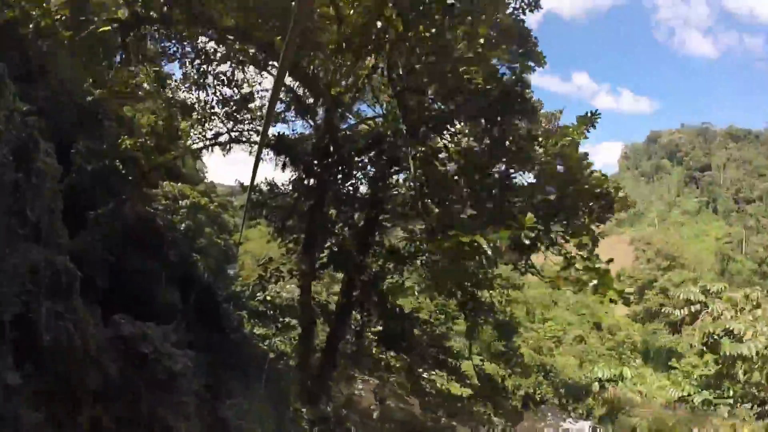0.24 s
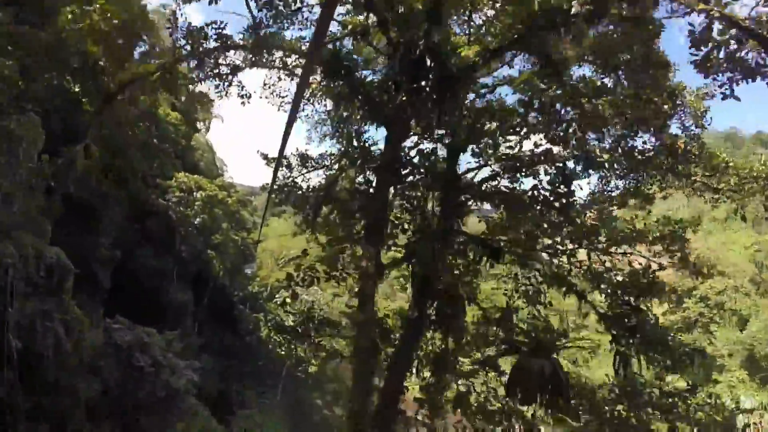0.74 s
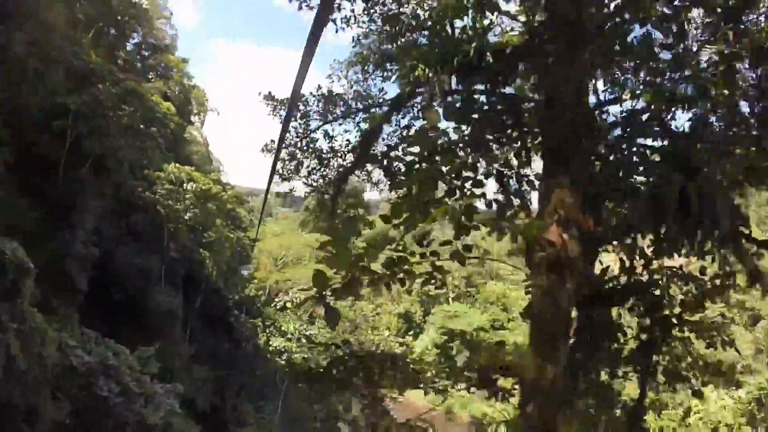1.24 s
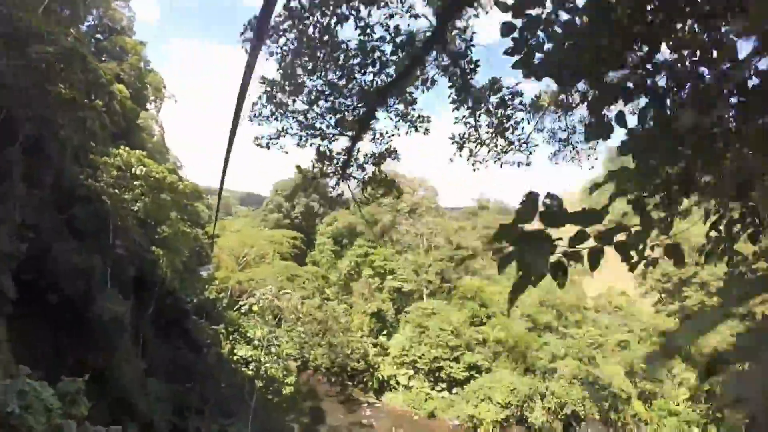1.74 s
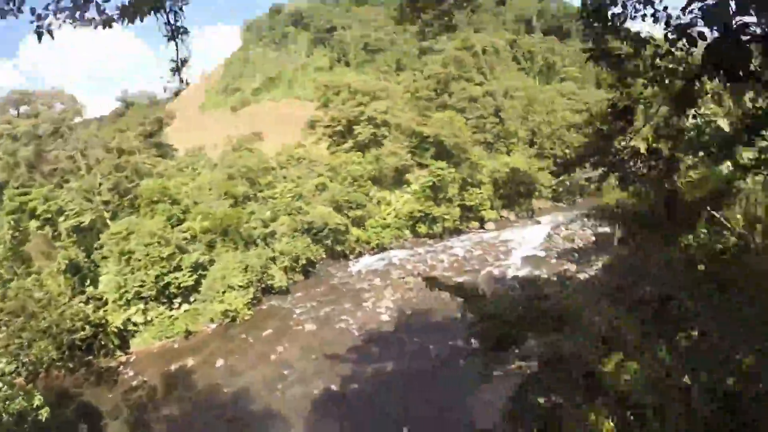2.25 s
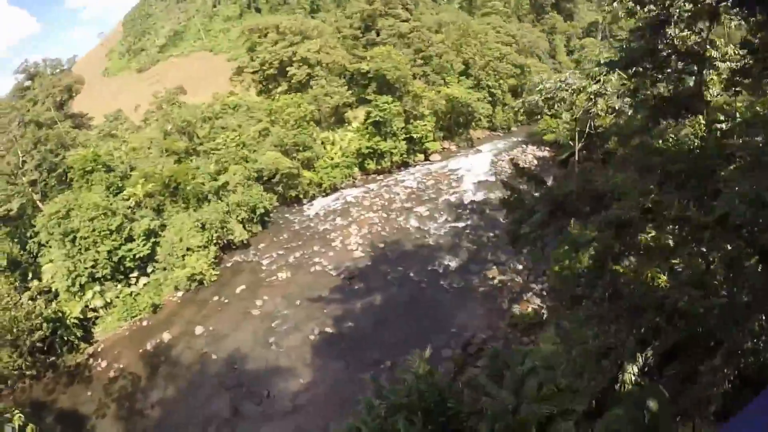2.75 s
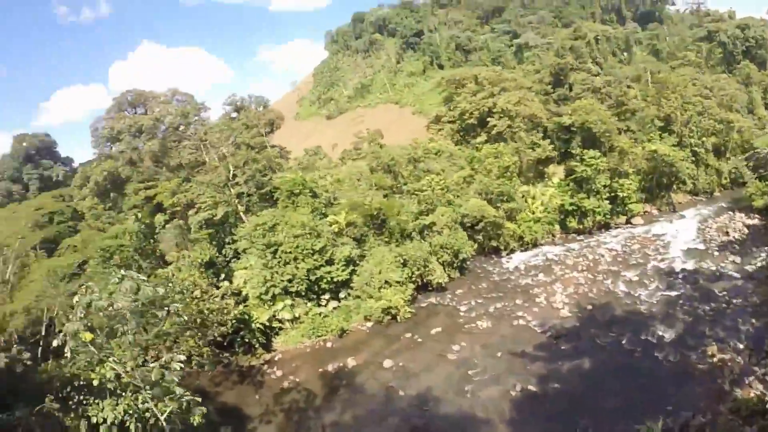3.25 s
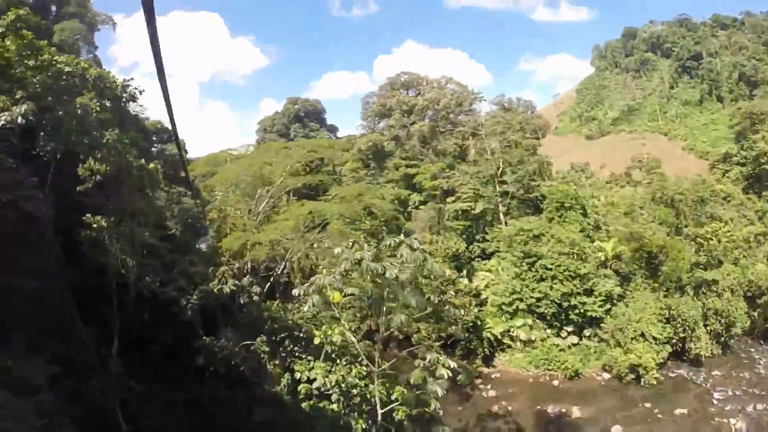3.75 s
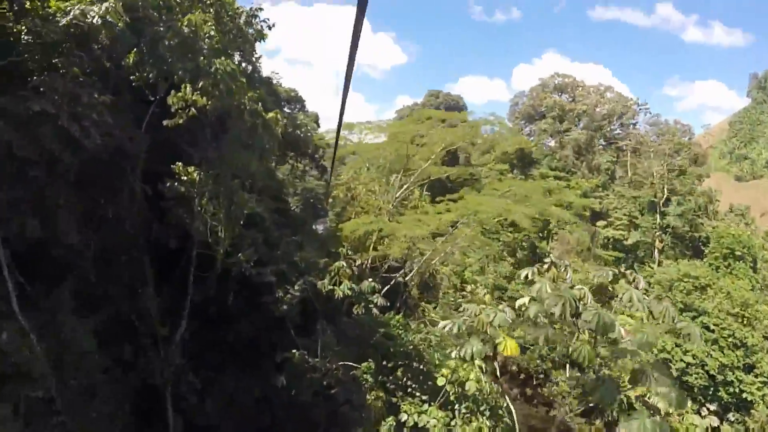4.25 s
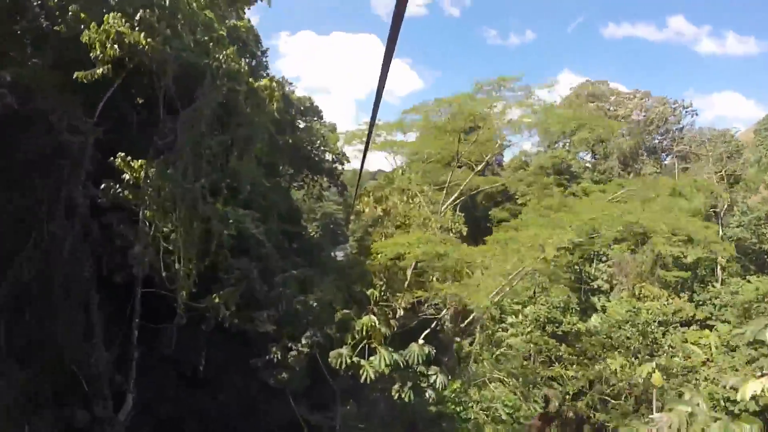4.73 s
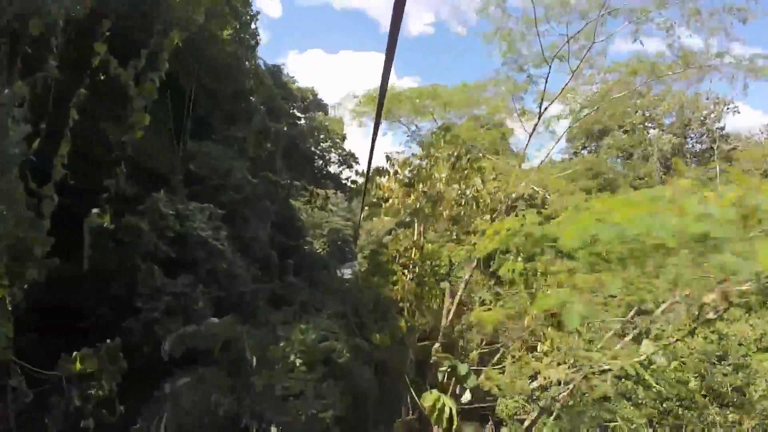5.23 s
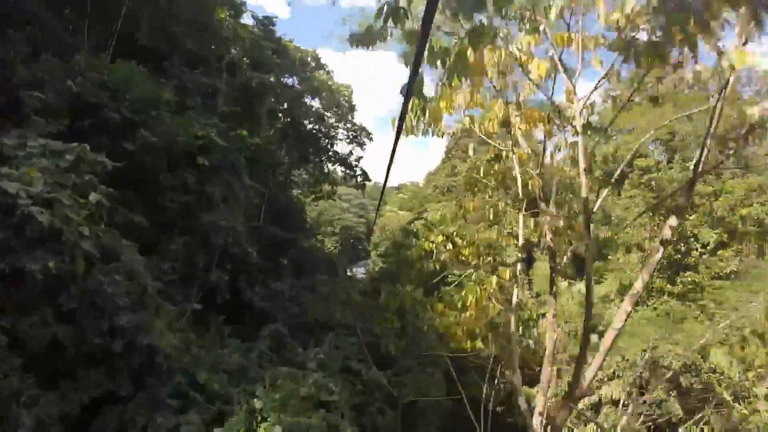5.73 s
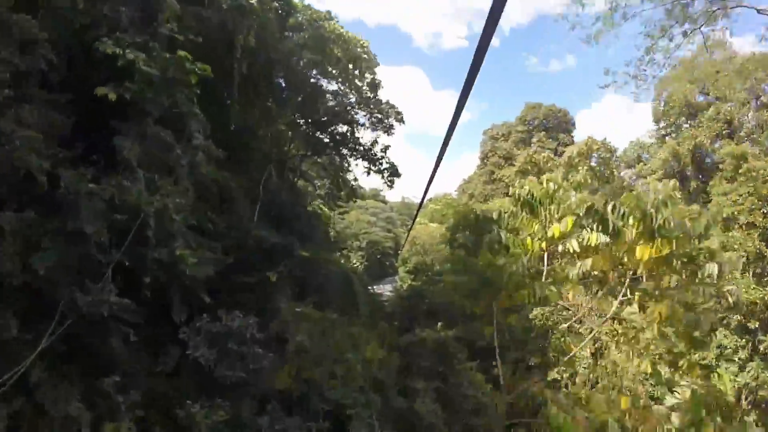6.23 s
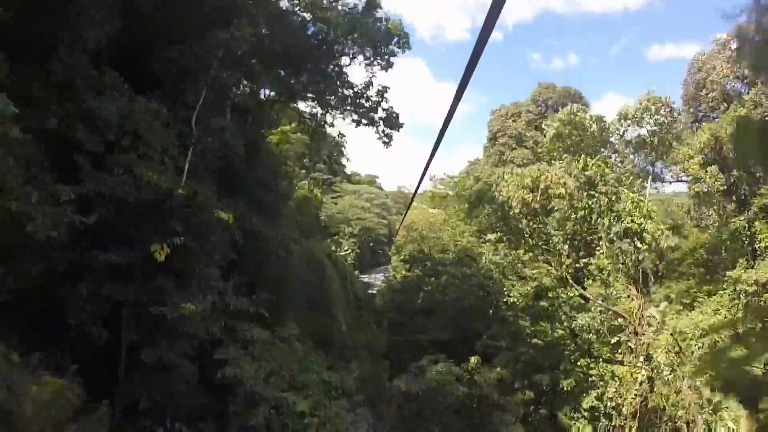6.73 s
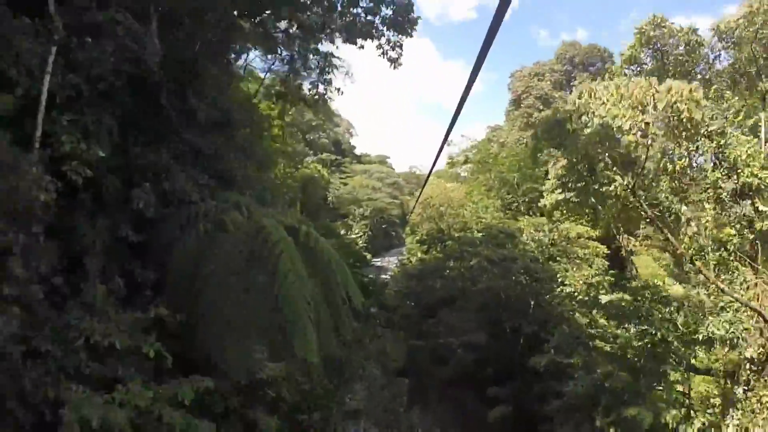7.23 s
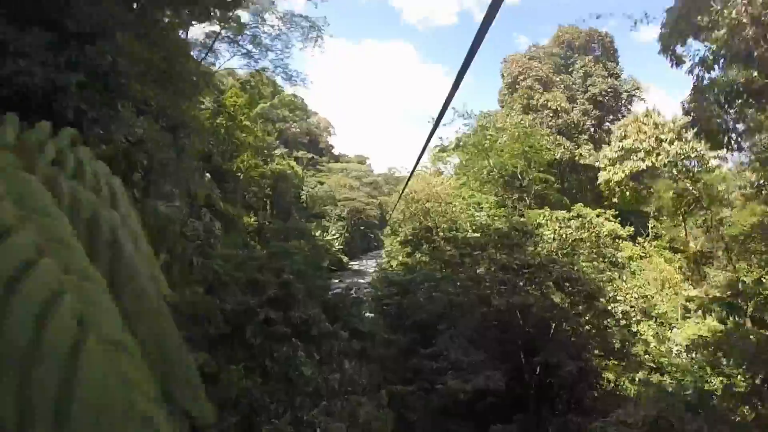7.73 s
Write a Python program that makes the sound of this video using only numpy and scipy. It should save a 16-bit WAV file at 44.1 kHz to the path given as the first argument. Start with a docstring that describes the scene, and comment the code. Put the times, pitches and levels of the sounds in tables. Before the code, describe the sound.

From 0 to 1.95 s a loud, gritty buzz with a tonal whine comes through a camera housing pressed against a zip line rig, strongest around 2 to 3 kHz, its low tone near 520 Hz and climbing. Short hard ticks from cable bumps are scattered at first, then cluster and strengthen from 1.4 to 1.9 s. At about 1.95 s a very brief rasping scrape breaks contact and the level collapses. From 2.3 to 3.3 s soft strap rubs, low rumbles and dull bumps touch the housing over a faint trolley hiss. The trolley then swells through the air by 3.2 s, dips slightly near 3.8, and grows to its fullest around 6.5 s, staying strong to 8 s: bright metallic hiss and whine, the fundamental reaching roughly 880 Hz, wavering and shifting in colour as the microphone turns. Weak low wind lies beneath. Dry, close, nearly mono, open air.

```python
"""A buzzing whine climbs in pitch as a trolley speeds up down a steel cable, over light wind. At first the
camera housing leans on the rig and buzzes with it; it scrapes free near 2 s and a strap brushes it, while the
trolley is heard through the air, its colour changing as the microphone turns. Strands passing under the
wheel drive swept sine tones, and bumps and grit drive noise filtered by shell or frame resonances."""
import sys
import numpy as np
from scipy import signal
from scipy.io import wavfile
from scipy.ndimage import uniform_filter1d

SR = 44100
rng = np.random.default_rng(int(sys.argv[2]) if len(sys.argv) > 2 else 0)


def digitize_waveform(pressure):
    """Quantize a signal to 16-bit integers and store it at the path in sys.argv[1].

    Rows of a 2-D input are taken as channels; values are limited to [-1, 1].
    """
    field = np.atleast_2d(pressure).T
    bounded = np.clip(field, -1, 1)
    quanta = np.round(bounded * 32767).astype(np.int16)
    wavfile.write(sys.argv[1], SR, quanta)


N = 351918
T = np.arange(N) / SR  # s


def gain_of(db):
    """Logarithmic level: decibels to amplitude gain."""
    return 10 ** (np.asarray(db) / 20)


def evened(x):
    """Normalisation: scales to rms 1."""
    return x / np.sqrt(np.mean(x ** 2) + 1e-20)


def read(points, hz):
    """Spectral envelope: interpolates a table of Hz and dB along log frequency."""
    f, value = np.transpose(points)
    return np.interp(np.log(hz + 1), np.log(f + 1), value)


def level(rows, order=1, before_db=-150):
    """Amplitude envelope: gain over time from a dB column, near silent outside the table by default."""
    rows = np.asarray(rows)
    return gain_of(np.interp(T, rows[:, 0], rows[:, order], left=before_db, right=-150))


def drift(seconds):
    """Low-passed random fluctuation: noise averaged twice over the given time, at rms 1."""
    size = max(round(seconds * SR), 2)
    once = uniform_filter1d(rng.standard_normal(N), size)
    return evened(uniform_filter1d(once, size))


def colour(x, field_db, patchy_db, size=1024):
    """Time-varying filtering: weights short-time spectra by field_db(hz, t) and drifting random patches."""
    overlap = size * 3 // 4
    hz, t, z = signal.stft(x, SR, nperseg=size, noverlap=overlap)
    patches = rng.standard_normal(z.T.shape).T
    patches = uniform_filter1d(patches, size=8, axis=0)  # across frequency
    patches = evened(uniform_filter1d(patches, size=16, axis=1))  # across time
    shape = gain_of(field_db(hz[:, None], t) + 0 * t)
    shape = shape / np.sqrt(np.mean(shape ** 2, axis=0))  # the same mean power in every frame
    shape = shape * gain_of(patchy_db * patches)
    return signal.istft(z * shape, SR, nperseg=size, noverlap=overlap)[1][:N]


def modes_db(hz, modes, order=2):
    """Resonance: a hump (or a dip, if negative) in dB at each mode, to add to a smooth spectrum."""
    return sum(mode[order] / (1 + (2 * (hz - mode[0]) / mode[1]) ** 2) for mode in modes)


def passes(hz, modes, floor_db=-150):
    """Transmission: gain of a path of flat-topped resonances at a moving frequency."""
    hz = hz[::64]  # the gain is held over steps of 64 samples
    gain = gain_of(floor_db)
    for f, width, db in modes:
        gain = gain + gain_of(db) / (1 + (2 * (hz - f) / width) ** 4)
    return np.repeat(gain, 64)[:N]


SWAY_HZ = (.9, 1.6, 2.3, 3.4, 5.2)
# fractional change of speed, growing with time
SWAY = .0022 * (1 + T / 6) * sum(np.sin(2 * np.pi * (f * T + rng.random())) for f in SWAY_HZ)
START_HZ, GAIN_HZ_PER_S, EASE_HZ_PER_S2 = 517.2, 74.0, 3.52


def strand_hz():
    """Passing rate is proportional to speed: it gains ever less as the cable flattens, and wavers with its swing."""
    return (START_HZ + GAIN_HZ_PER_S * T - EASE_HZ_PER_S2 * T ** 2) * (1 + SWAY)


def turns():
    """Phase is the integral of frequency: strands passed so far."""
    return np.cumsum(strand_hz()) / SR


STRANDS_PER_TURN = 12.8  # strands passed in one turn of the wheel


def rolling(bumps_db, grit_db, throb_db, strand_db, wheel_db):
    """Rolling excitation: strand harmonics 4 to 7, and clumped grit pulsing with strand and wheel."""
    phase = turns() + 0.023 * drift(0.016)
    bumps = sum(gain_of(1.9 * drift(0.032)) * np.cos(2 * np.pi * k * phase) for k in range(4, 8))
    wheel = np.cos(2 * np.pi * (phase / STRANDS_PER_TURN + 0.43 * drift(0.092)))
    pulsing_db = strand_db * np.cos(2 * np.pi * phase) + wheel_db * wheel + throb_db * drift(0.0091)
    force = gain_of(bumps_db) * bumps
    for kind in ("low", "high"):  # coarse and fine grit clump apart, split at 7 kHz
        clumps_db = grit_db * np.minimum(drift(0.0019), 2)
        grit = evened(rng.standard_normal(N) * gain_of(clumps_db + pulsing_db))
        force += signal.sosfilt(signal.butter(2, 7000, kind, fs=SR, output="sos"), grit)
    return force


LEAVE_S, LEAVE_DB_PER_S = 1.96, 1302


def leaning():
    """Contact coupling: gain 1 while the housing touches the rig, then a quick fade."""
    return gain_of(-LEAVE_DB_PER_S * np.maximum(T - LEAVE_S, 0))


# The strap's touches on the housing. Each row: start in seconds, hold in seconds, rub level in dB,
# relative level of rumble and wobble in dB, level of the lowest whine tone in dB.
TOUCHES = [(2.36, .065, -45, -49, -44), (2.44, .3, -54, -46, -49), (2.75, .19, -51, -43, -48),
           (2.95, .06, -51, -52, -53), (3.085, .03, -52, -49, -56), (3.31, .02, -53, -54, -66)]
TOUCH_DB_PER_S, LIFT_DB_PER_S = 600, 700


def touched(order):
    """Intermittent contact: rise, hold and release of one column of touches, summed by power."""
    power = 0
    for row in TOUCHES:
        rise_db = TOUCH_DB_PER_S * np.maximum(row[0] - T, 0)
        release_db = LIFT_DB_PER_S * np.maximum(T - row[0] - row[1], 0)
        power = power + gain_of(row[order] - rise_db - release_db) ** 2
    return np.sqrt(power)


# The trolley through the air. Each row: time in seconds, level in dB,
# facing of the microphone (0 aside, 1 ahead), lift of the treble near 9 kHz in dB.
AIR = [(2.0, -46, 0.33, -2), (2.296, -44, 0.42, 0.3), (2.42, -42.5, 0.39, 3), (2.83, -37, 0.41, 3.2),
       (3.2, -29, 0.45, 0.5), (3.3, -28.5, 0.36, 2.2), (3.82, -31, 0.28, -0.3), (4.89, -26, 0.49, 0),
       (5.55, -27, 0.38, -2.3), (5.96, -23.5, 0.45, -3), (6.52, -22.5, 0.62, -5), (7.2, -25, 0.54, -3),
       (7.5, -23, 0.59, -5), (7.98, -25, 0.62, -4)]
AIR_BEFORE_DB = -47  # held until the first row


def air_level():
    """Airborne path: the trolley's gain over time."""
    return level(AIR, before_db=AIR_BEFORE_DB)


# Resonances that the strand tones sweep through by way of shell, harness and air.
# Each row: frequency in Hz, width in Hz, gain in dB (for the air, relative to the trolley's level).
VIA_SHELL = [(588, 95, -32), (987, 43, -43), (1233, 110, -48.5), (1610, 85, -45.5), (1800, 150, -40),
             (1916, 72, -31.5)]
VIA_HARNESS = [(644, 103, -59)]
VIA_AIR = [(799, 160, -32.5), (1557, 77, -29), (1686, 100, -20.5), (2385, 370, -17), (2568, 130, -10.5)]
SHELL_FLOOR_DB, AIR_FLOOR_DB = -56, -42  # gain away from the resonances
STRAP_DB_PER_TONE = -28


def whine():
    """Periodic excitation: the three lowest strand harmonics by four paths, the higher wavering more."""
    phase = turns() + 0.03 * drift(0.024)
    shell, air = leaning(), air_level()
    webbing = touched(order=4) * gain_of(2.5 * drift(.03))
    out = 0
    for k in range(1, 4):
        hz = k * strand_hz()
        path = shell * passes(hz, VIA_SHELL, SHELL_FLOOR_DB)
        path = path + air * passes(hz, VIA_AIR, AIR_FLOOR_DB)
        path = path + passes(hz, VIA_HARNESS)
        path = path + webbing * gain_of(STRAP_DB_PER_TONE * (k - 1))
        waver = gain_of(0.54 * k * drift(0.021) + 0.68 * k * drift(0.15))
        cycles = k * phase + 0.044 * (k - 1) * drift(.006)
        out = out + path * waver * np.sin(2 * np.pi * cycles)
    return np.sqrt(2) * out


# The housing pressed on the rig. Each row: time in seconds, buzz level in dB,
# lift of the treble above 4 kHz in dB.
CONTACT = [(0, -23.5, -2), (.2, -24, -1), (.6, -25, 3), (1.3, -24, 4), (1.5, -21, 3.5), (1.65, -23.5, -1),
           (1.94, -26.5, -0.5), (1.961, -26, -9), (2.02, -38, -1)]
# Sound carried through the shell. Each row: frequency in Hz, relative density in dB per Hz.
HOUSING = [(71, -56), (120, -37), (456, -10), (579, -7), (679, -16), (1030, -19.5), (1230, -14),
           (1420, -20), (2200, 3), (2790, 1), (4240, -23), (6190, -20), (8860, -33), (10600, -29.5),
           (14000, -53)]
# Shell modes. Each row: frequency in Hz, width in Hz, rise in dB.
SHELL = [(171, 22, 12), (360, 26, 12.5), (1550, 86, 6.5), (3600, 150, -2), (4020, 140, 10.5),
         (4000, 140, -8), (2120, 280, 4), (2725, 210, 4), (3210, 160, 6), (3930, 120, 3.5),
         (4780, 160, 6.5), (5270, 130, -2), (6210, 79, 6.5), (7970, 200, 8), (10220, 260, 6)]


def housing_buzz():
    """Structure-borne sound: the rolling force filtered by the shell's modes while it touches the rig."""
    force = rolling(bumps_db=-21.0, grit_db=1.7, throb_db=.5, strand_db=2.5, wheel_db=1.3)
    s, _, treble_db = np.transpose(CONTACT)

    def shell_db(hz, t):
        """Modal superposition: smooth spectrum, resonances and a moving treble shelf."""
        shelf = 1 / (1 + (4000 / (hz + 1)) ** 6)
        return read(HOUSING, hz) + modes_db(hz, SHELL) + np.interp(t, s, treble_db) * shelf

    return evened(colour(force, shell_db, patchy_db=1.8)) * level(CONTACT) * leaning()


# The wheel's turn felt in the shell. Each row: multiple of the turning rate, central peak level in dB.
WHEEL_HUM = [(1, -60), (2, -59.5), (3, -58.5), (5, -60.5)]


def wheel_hum():
    """Rotational harmonics: wavering sines at multiples of the wheel's rate, while the shell touches."""
    out = 0
    for multiple, db in WHEEL_HUM:
        hum = np.sin(2 * np.pi * multiple * turns() / STRANDS_PER_TURN)
        out = out + gain_of(db + 5.5 * drift(0.1)) * hum * leaning()
    return out


# Spectra of the trolley heard aside and ahead. Each row: frequency in Hz, relative density in dB per Hz.
ASIDE = [(530, -16.5), (900, -27), (1390, -2.5), (1590, -11.5), (1920, -4), (2490, 2), (3110, 10.5),
         (3340, -1.5), (5360, -10.5), (6030, -6.5), (7460, -10), (10400, -13.5), (11700, -26), (13800, -21),
         (15200, -37)]
AHEAD = [(530, -36.5), (900, -27), (1410, -31), (1630, -9.5), (1990, -30.5), (2210, -11.5), (2610, 2.5),
         (2900, -20), (3460, 2.5), (4820, -1), (6030, 0), (6870, -10), (9460, -5), (13500, -23.5),
         (15200, -27)]
# Frame and wheel modes. Each entry: frequency in Hz.
FRAME_HZ = [1640, 2232, 2600, 2880, 3381, 3780, 4123, 4420, 4595, 5092, 5400, 5810, 6150, 6270, 7520, 8172,
            8507, 10065, 10258, 10700, 13800]
# The same modes in order. Each row: width in Hz, rise aside in dB, rise ahead in dB.
FRAME = [(121, 6.5, 0.93), (46, -5, 26.5), (83, 5, 1.7), (210, 5, 0.33), (94, 18, 1.7), (180, 4, 9.1),
         (74, -4, 22.7), (43.2, 9.5, 18), (60, 17, .3), (49.7, 4.5, 20.4), (220, 1.5, 2.7), (150, 8, 8.2),
         (80, -4.5, 30), (100, 7.5, 14.5), (100, -1.5, 1.3333), (65, -7, 2), (75.6, 17.5, 1.7),
         (60, -14, 2.3), (50, 16.5, 7.3), (151, 4, 1), (111, -2, 6)]
# a passing dip in the hiss while the microphone looks aside
HOLLOW_HZ, HOLLOW_WIDTH_HZ, HOLLOW_DB, HOLLOW_S, HOLLOW_SPAN_S = 5400, 320, -9, 2.5, .6


def trolley():
    """Directional radiation: the rolling force rings frame and wheels, coloured by the microphone's facing."""
    s, _, facing, treble_db = np.transpose(AIR)
    frame = np.column_stack([FRAME_HZ, FRAME])

    def field_db(hz, t):
        """Directivity: a blend in dB of the spectra aside and ahead."""
        share = np.clip(np.interp(t, s, facing), -.3, 1.3)
        aside = read(ASIDE, hz) + modes_db(hz, frame)
        ahead = read(AHEAD, hz) + modes_db(hz, frame, order=3)
        dip = modes_db(hz, [(HOLLOW_HZ, HOLLOW_WIDTH_HZ, HOLLOW_DB)])
        hollow = dip * np.exp(-((t - HOLLOW_S) / HOLLOW_SPAN_S) ** 2)
        treble = np.exp(-(np.log2((hz + 1) / 9000) / .5) ** 2)
        return (1 - share) * aside + share * ahead + np.interp(t, s, treble_db) * treble + hollow

    force = rolling(bumps_db=-25.5, grit_db=0.5, throb_db=0.67, strand_db=1.0, wheel_db=0.8)
    return evened(colour(force, field_db, patchy_db=0.62)) * air_level()


# Wind spectrum. Each row: frequency in Hz, relative density in dB per Hz.
WIND = [(12, -23), (20, 5), (59, 4.5), (114, -7.5), (297, -14), (445, -19.5), (633, -16), (774, -11.5),
        (1010, -17.5), (1100, -20), (1430, -19), (2420, -120)]
WIND_DB, WIND_FALL_DB_PER_S, GUST_DB = -50, 0.6, -1


def wind():
    """Turbulent pressure: soft lumpy low noise at the microphone port, gusting and slowly weakening."""
    lumps = rng.standard_normal(N) * gain_of(1 * drift(0.017))
    gusts = gain_of(WIND_DB - WIND_FALL_DB_PER_S * T + GUST_DB * drift(0.073))
    return evened(colour(lumps, lambda hz, t: read(WIND, hz), patchy_db=2.0, size=2048)) * gusts


# Rough spots of the cable knocking the shell. Each row: start in seconds, approximate peak in dB,
# frequency in Hz.
JOLTS = [(0.0588, -20, 3000), (0.1111, -17, 2090), (0.3022, -15, 2090), (0.5881, -16, 2200),
         (0.8505, -14, 2310), (0.9882, -13, 2310), (1.425, -22, 2470), (1.47, -14, 2500),
         (1.581, -19, 2800), (1.6663, -11.5, 2050), (1.762, -14, 2500), (1.8387, -12.5, 1970),
         (1.8612, -9, 2180), (1.924, -12, 2000)]


def jolts():
    """Impulse response: each knock is a sine that swells and decays within a few cycles."""
    out = 0
    for s, db, hz in JOLTS:
        cycles = np.maximum(T - s, 0) * hz
        swell = cycles * np.exp(-.55 * cycles)
        out = out + gain_of(db + 3) * swell * np.sin(2 * np.pi * cycles)  # +3 dB offsets the swell's peak
    return out


# The shell slides off. Each row: time in seconds, relative level in dB.
SCRAPE = [(1.938, -48), (1.947, -1.5), (1.96, 2), (1.972, -21), (1.984, -43)]
# Colour of the scrape. Each row: frequency in Hz, relative density in dB per Hz.
SCRAPE_TONE = [(500, -42), (900, -7.5), (3000, -8), (4500, -14), (7000, -24), (10500, -29), (14500, -45)]
# What it rings with. Each row: frequency in Hz, relative level in dB.
SCRAPE_RINGS = [(1290, -30), (1490, -49), (2340, -30), (3060, -22), (4050, -31), (5880, -31), (7570, -49),
                (10200, -45)]


def scrape():
    """Sliding friction: a brief noisy rasp with unsteady ringing tones as the shell comes free."""
    rasp = evened(colour(rng.standard_normal(N), lambda hz, t: read(SCRAPE_TONE, hz), patchy_db=0.5))
    rings = sum(gain_of(db) * np.sin(2 * np.pi * (hz * T + 0.22 * drift(0.002))) for hz, db in SCRAPE_RINGS)
    return (gain_of(-29.0) * rasp + gain_of(-2.0) * rings) * level(SCRAPE)


# Colour of the rub. Each row: frequency in Hz, relative density in dB per Hz.
RUB = [(120, -30), (250, -10), (380, 4), (560, 6.5), (750, -3), (1000, -6.5), (1350, -6), (1700, -24),
       (2500, -60)]
# Dull knocks on the shell. Each row: start in seconds, approximate peak in dB, frequency in Hz.
BUMPS = [(1.945, -41, 62), (2.764, -34, 86), (2.801, -46, 61.9), (2.847, -37, 101), (3.097, -41, 61),
         (3.314, -44, 112)]


def strap():
    """Dry friction: webbing drags over the shell with grainy rub, rumble and wheel wobble; dull knocks strike
    the shell, the first as it slides free of the rig."""
    grains = rng.standard_normal(N) * gain_of(2 * drift(.008))
    rub = evened(colour(grains, lambda hz, t: read(RUB, hz), patchy_db=2)) * touched(order=2)
    low_band = signal.butter(2, [45, 130], "band", fs=SR, output="sos")
    rumble = evened(signal.sosfilt(low_band, rng.standard_normal(N)))
    wobble = np.sin(2 * np.pi * turns() / STRANDS_PER_TURN)  # once a turn of the wheel
    out = rub + (gain_of(-7.5) * rumble + gain_of(1.0) * wobble) * touched(order=3)
    for s, db, hz in BUMPS:
        cycles = np.maximum(T - s, 0) * hz
        swell = cycles * np.exp(-1.6 * cycles)
        out += gain_of(db + 15.5) * swell * np.cos(2 * np.pi * cycles)  # +15.5 dB offsets the swell's peak
    return out


# Faint difference of the channels. Each row: frequency in Hz, relative side-to-mid level in dB.
WIDTH = [(60, -23), (110, -26), (200, -11), (380, -31), (690, -43), (1280, -20.5), (2350, -62), (4330, -51),
         (7990, -35), (14700, -13)]


def scene():
    """Mid-side stereo: one microphone hears it all; a random-phase side makes the channels flicker apart."""
    mid = whine() + housing_buzz() + wheel_hum() + trolley() + wind() + jolts() + scrape() + strap()
    hz, t, z = signal.stft(mid, SR, nperseg=1024)
    random_phase = np.exp(2j * np.pi * rng.random(z.T.shape).T)
    z = z * gain_of(read(WIDTH, hz))[:, None] * random_phase
    side = gain_of(-7.0) * signal.istft(z, SR, nperseg=1024)[1][:N]
    return np.array([mid + side, mid - side])


EDGE_HZ = 15300


def record(dry):
    """Band limiting: a steep linear-phase low-pass."""
    low_pass = signal.firwin(1023, EDGE_HZ, window=("kaiser", 9), fs=SR)
    return signal.oaconvolve(dry, low_pass[None], "same")


dry = scene()
out = record(dry)
digitize_waveform(out)
```